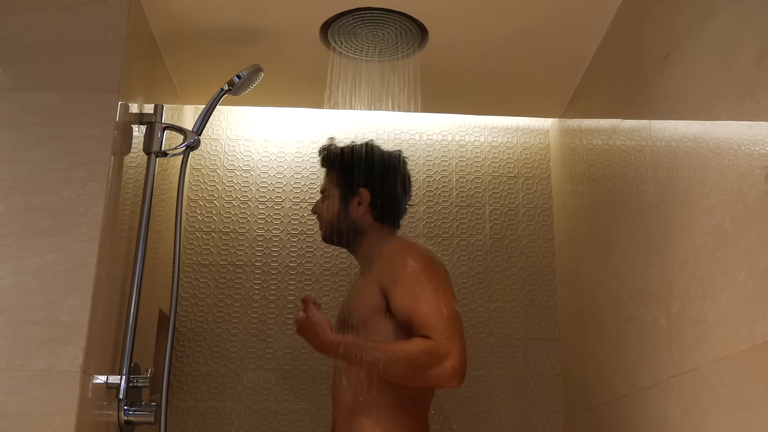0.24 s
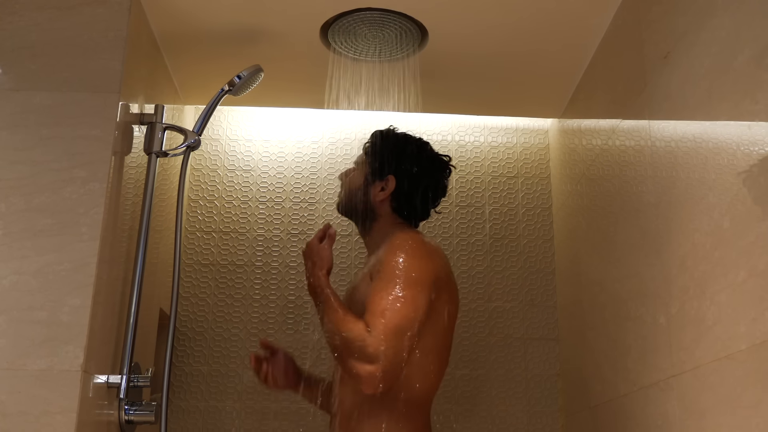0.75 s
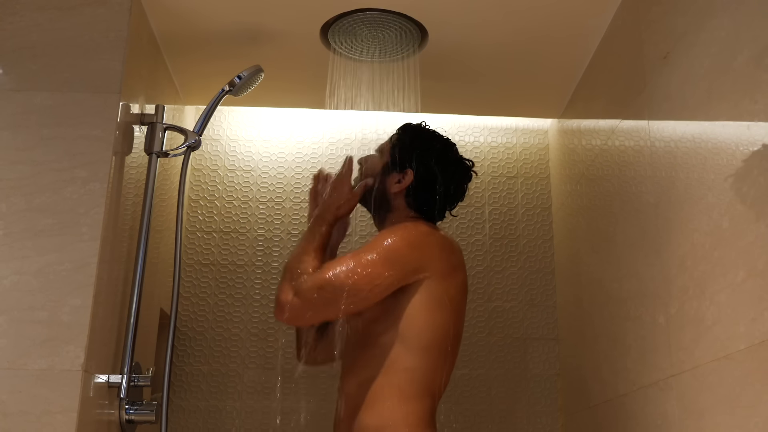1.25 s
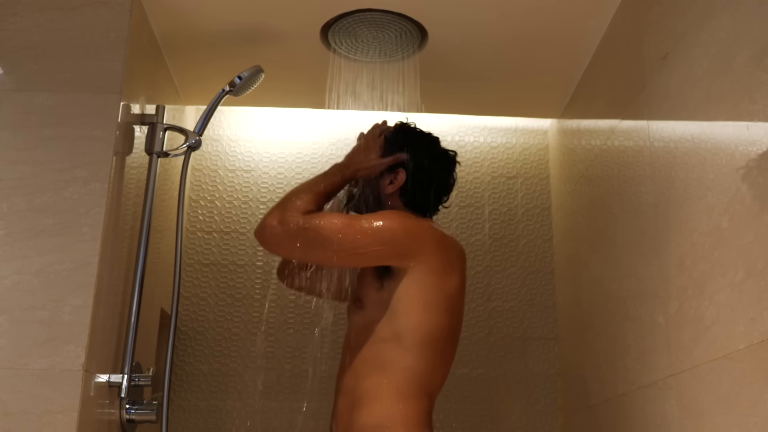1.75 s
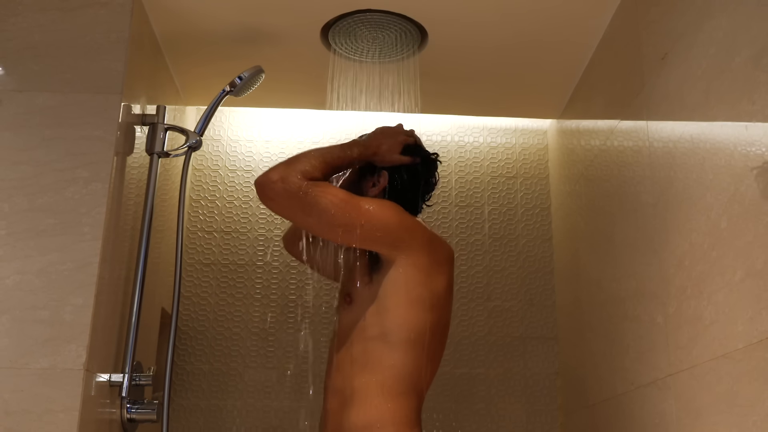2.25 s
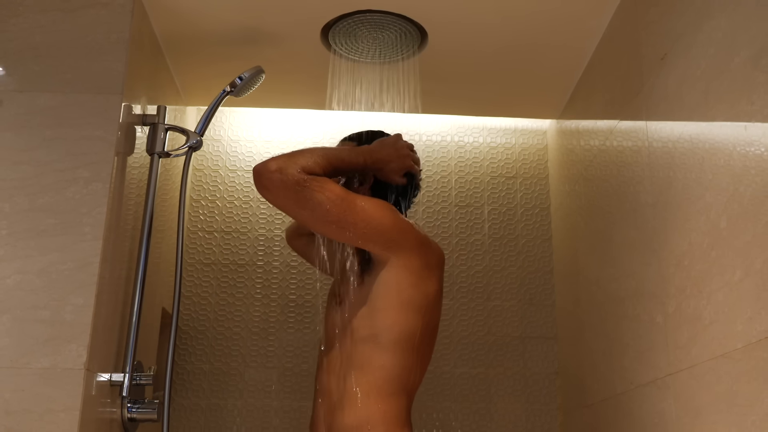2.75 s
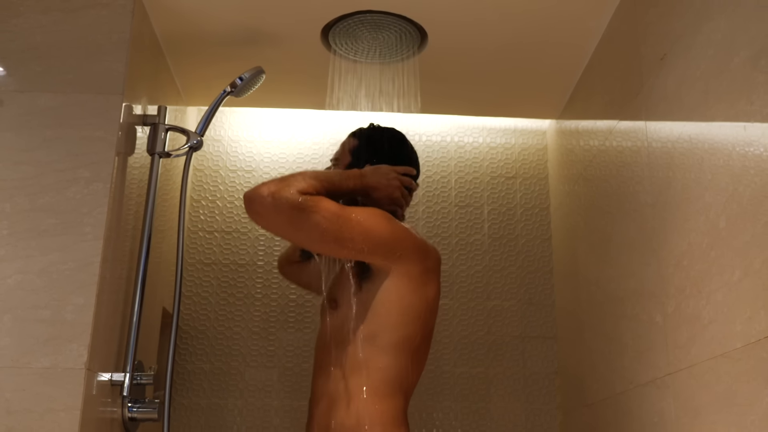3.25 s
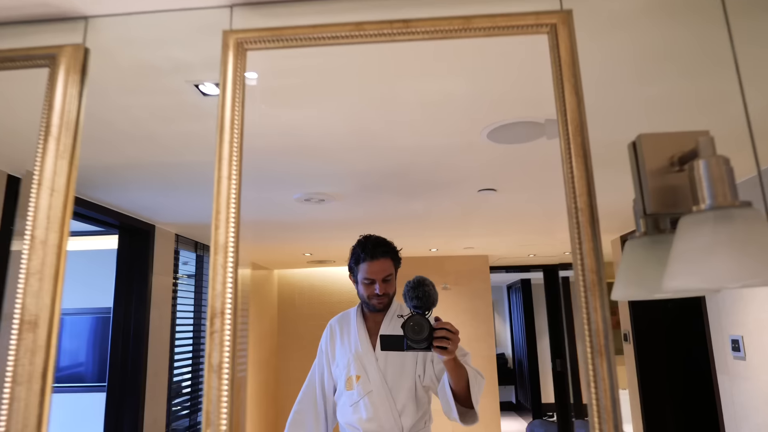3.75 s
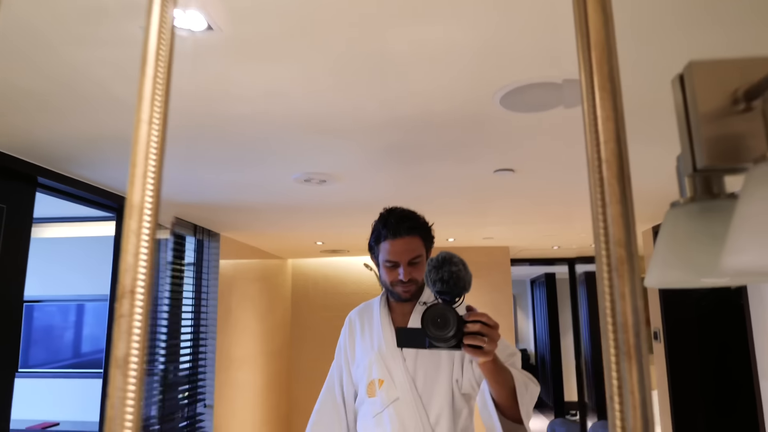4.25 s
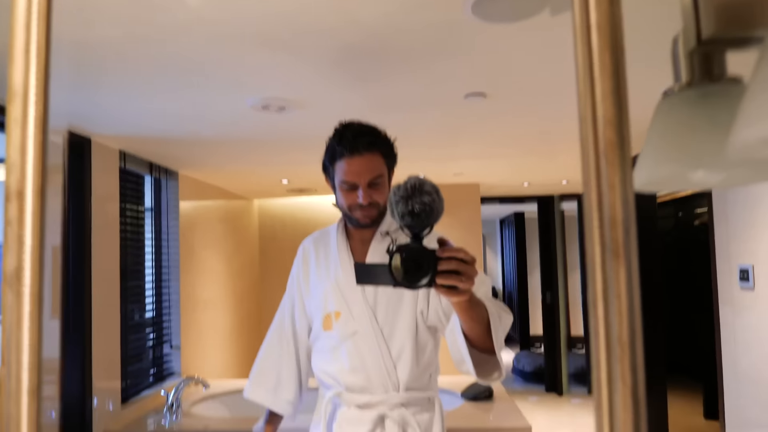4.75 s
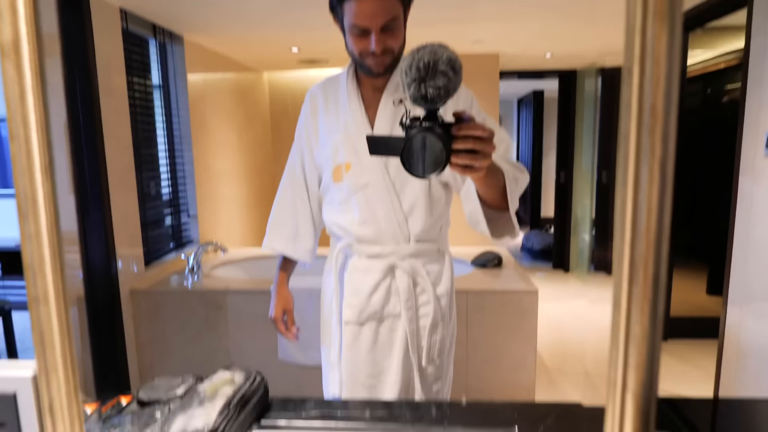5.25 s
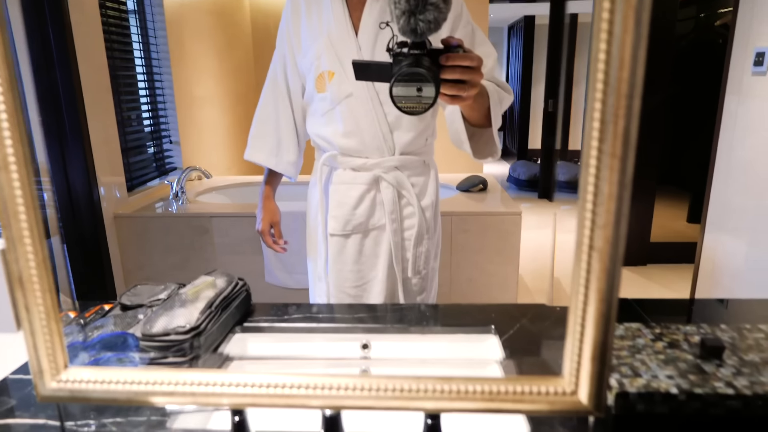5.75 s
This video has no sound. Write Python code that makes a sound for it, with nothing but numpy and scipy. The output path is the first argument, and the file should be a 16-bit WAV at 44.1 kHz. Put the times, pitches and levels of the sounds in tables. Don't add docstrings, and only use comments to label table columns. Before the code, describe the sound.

A bright overhead shower hisses and splashes in a hard tiled stall, then cuts abruptly to a low ventilation hum with faint cloth and soft steps.

```python
import sys
import numpy as np
from scipy import signal
from scipy.fft import rfft, irfft
from scipy.io import wavfile
from scipy.ndimage import uniform_filter1d

SR = 44100
rng = np.random.default_rng(int(sys.argv[2]) if len(sys.argv) > 2 else 0)


def level_to_linear(level):
    exponent = np.asarray(level, float) / 20
    return 10 ** exponent


def wav_record(signal):
    frames = np.transpose(np.atleast_2d(signal))
    bounded = np.clip(frames, -1, 1)
    quanta = np.round(bounded * 32767).astype(np.int16)
    wavfile.write(sys.argv[1], SR, quanta)


N = 264156
CUT_S, CUT_FADE_S = 3.7308, 0.002

# frequency in Hz, level in dB per Hz.
VENT_SPECTRUM = [(11, -44), (25, -13), (48, -17.5), (123, -2), (155, -13.5), (173, -11.5), (230, -11),
                 (332, -17.5), (480, -21.5), (619, -25), (1150, -37.5), (1410, -41), (3110, -58.5),
                 (16000, -69.5)]
# frequency in Hz, width in Hz, lift in dB.
DUCT_MODES = [(75, 13, 4), (121, 64, 5), (197, 25, 4), (330, 25, 4), (395, 44, 7), (603, 29, 5.5)]
# frequency in Hz, level in dB per Hz.
CLOTH_SPECTRUM = [(590, -16), (1000, -3.5), (1300, -6.5), (2400, -10), (4100, -9.5), (5500, -19.5),
                  (16000, -35.5)]
# time in seconds, rustle level in dB.
ROBE_MOTION = [
    (3.76, -71),
    (4.0, -63),
    (4.03, -61),
    (4.2, -64),
    (4.28, -59.5),
    (4.38, -66),
    (4.55, -63.5),
    (5.1, -72),
    (5.96, -71),
]
# start in seconds, peak in dB, centre in Hz, length in seconds, width in octaves.
CLOTH_CREASES = [
    (4.009, -55, 3960, .015, .7),
    (4.012, -54, 1630, .14, .12),
    (4.262, -54, 2520, 0.035, 0.8),
    (4.46, -62, 6000, .07, 1.1),
    (5.092, -55.5, 3310, 0.011, 0.36),
]
# start in seconds, peak in dB, centre in Hz, length in
# seconds, width in octaves.
LOW_SWELLS = [
    (4.47, -23.5, 90, 0.05, 0.88),
    (5.972, -20.5, 121, 0.085, 0.33),
]

# frequency in Hz, level in dB per Hz.
WASH_SPECTRUM = [(8.2, -53.5), (14, -24), (53, -15.5), (87, -1), (162, -4), (204, -8), (246, -5.5),
                 (390, -9.5), (458, -11.5), (663, -8.5), (744, -3.5), (1210, -10.5), (1330, -9),
                 (2360, -9.5), (3500, -7.5), (4550, -32), (7700, -120)]
# frequency in Hz, width in Hz, lift over the wash in dB.
STALL_MODES = [(40, 11, 8), (102, 20, 2.5), (162, 18, 4), (238, 11, 6), (455, 11, 11), (524, 34, 6),
               (633, 40, 5.5), (944, 20, 7.5), (1038, 15, 6), (1125, 11, 11), (1311, 18, 2), (1449, 140, 4),
               (1567, 30, 8.5)]
# centre time in seconds, peak in dB, length in seconds.
TRAP_GULPS = [(0, -43.5, .04), (0.168, -43, 0.059), (0.36, -37, 0.072), (1.107, -39, 0.15),
              (1.37, -42, 0.039), (1.724, -43, 0.037), (1.985, -35, 0.052), (2.4, -46.5, .04),
              (2.692, -39, 0.034), (2.874, -43.5, 0.051), (3.191, -33, 0.053), (3.314, -37.5, 0.047),
              (3.425, -36, .06)]
# frequency in Hz, level in dB per Hz.
PATTER_SPECTRUM = [(1000, -35), (1800, -5.5), (2400, -7.5), (3000, -11.5), (3700, 1.5), (4400, 2),
                   (5100, -6.5), (6500, -7), (9000, -8.5), (12000, -34.5)]
# frequency in Hz, level in dB per Hz.
SPRAY_SPECTRUM = [(3000, -29.5), (5000, -2), (7000, -5), (8800, -0.5), (10800, -2.5), (13000, -1.5),
                  (15000, -3), (17000, -6)]
# time in seconds, run-off in dB, mist in dB.
RUNOFF_MIST = [(0, -32.5, -32.5), (.3, -32.5, -31.5), (.7, -32, -34), (1.1, -31, -31), (1.28, -29, -31),
               (1.35, -24.5, -32), (1.43, -31.5, -31), (1.7, -29.5, -30), (1.82, -33, -31.5),
               (1.98, -29, -31.5), (2.12, -32.5, -29), (2.36, -26.5, -29), (2.66, -29, -32.5),
               (2.85, -26, -31), (3.08, -30, -32.5), (3.16, -27, -30.5), (3.45, -27.5, -33.5),
               (3.71, -25, -30)]
# start in seconds, peak in dB, centre in Hz.
SPRAY_SPITS = [(0.2724, -23, 12700), (0.2912, -18, 14200), (0.5307, -14, 10300), (0.7643, -16.5, 11900),
               (0.8525, -22.5, 11400), (0.8689, -16, 11500), (1.0333, -20.5, 11800), (1.3804, -19.5, 10200),
               (1.3972, -14.5, 12300), (1.4674, -18, 10200), (1.5933, -16, 9950), (1.934, -20, 13700),
               (1.9679, -24.5, 12100), (1.9994, -23, 13700), (2.0734, -16.5, 13500), (2.2194, -19.5, 12800),
               (2.2932, -17, 9980), (2.3304, -22, 9960), (2.385, -19.5, 10900), (2.4634, -21.5, 11100),
               (2.8294, -18.5, 10300), (2.8968, -19.5, 12800), (2.9334, -16.5, 12500), (3.0554, -23, 10500),
               (3.0864, -18, 12400), (3.3854, -19, 9870), (3.5379, -16, 10800), (3.6028, -16.5, 9880),
               (3.6591, -16, 9830), (3.7264, -20, 10200)]
# start in
# seconds, peak in dB, centre in Hz.
SPLAT_BRIGHT_PARTS = [(0.1376, -16, 6050), (1.1044, -18, 7170), (1.2291, -17, 5400), (1.3793, -21, 5860),
                      (1.4666, -15.5, 7920), (1.5933, -17, 7620), (1.8731, -17, 5560), (1.9385, -17, 6870),
                      (1.9669, -13, 7560), (2.2543, -15, 6360), (2.3264, -15, 7690), (2.4578, -11.5, 6980),
                      (2.5124, -20, 6820), (2.83, -13, 6150), (2.9274, -16.5, 6020), (3.0275, -14, 6390),
                      (3.237, -11, 5580), (3.3842, -13, 5470), (3.488, -8, 6050), (3.6067, -15.5, 6030),
                      (3.7219, -13.5, 5580)]
# start in seconds, peak in dB, centre in Hz, width in octaves.
FLOOR_SPLATS = [(0.1474, -22, 3720, 0.25), (0.3885, -13.5, 4100, 0.11), (0.4378, -17, 4170, 0.17),
                (0.854, -18.5, 3870, 0.27), (1.1942, -18.5, 4000, 0.27), (1.2815, -17.5, 4960, 0.33),
                (1.3112, -12, 4240, 0.27), (1.3398, -9.5, 3520, 0.31), (1.5976, -14.5, 3920, 0.21),
                (1.8735, -14.5, 3760, 0.41), (1.94, -21, 4240, 0.32), (1.9673, -15, 4500, 0.32),
                (2.324, -17.5, 4540, 0.24), (2.4195, -18.5, 4100, 0.34), (2.4583, -16.5, 4350, 0.27),
                (2.5252, -11, 3780, 0.51), (2.5842, -14, 4100, 0.45), (2.6111, -9, 4020, 0.28),
                (2.7926, -12.5, 4070, 0.35), (2.837, -11.5, 4450, 0.7), (2.8878, -13.5, 3470, 0.6),
                (2.9327, -11, 3680, 0.34), (2.9692, -14, 4010, 0.27), (3.2342, -11.5, 3950, 0.27),
                (3.3394, -17.5, 4410, 0.24), (3.3835, -18.5, 3640, 0.22), (3.4117, -12.5, 4100, 0.31),
                (3.6047, -14, 3870, 0.27), (3.6448, -20, 4250, 0.21), (3.672, -12, 3890, 0.27)]
# start in seconds, peak in dB, centre in Hz, length in seconds, width in octaves.
WATER_HANDFULS = [
    (1.516, -16, 3400, 0.02, 0.35),
    (1.7744, -24, 2960, 0.013, 0.38),
    (2.167, -21, 3400, 0.02, 0.38),
    (2.852, -13, 3220, 0.011, 0.38),
    (3.126, -11, 3150, 0.031, 0.46),
    (3.296, -9, 3160, 0.015, 0.38),
    (3.4827, -8, 3340, 0.02, 0.43),
]
# start in seconds, level in dB, centre in Hz.
CHANNEL_SLIPS = [
    (.005, -22, 10200),
    (.401, -20, 6400),
    (.401, -21, 12200),
    (.633, -22, 13200),
    (1.492, -19, 13700),
    (1.655, -17, 7460),
    (2.677, -24, 13000),
    (2.769, -18, 7460),
    (2.769, -20, 10200),
    (2.769, -18.5, 14700),
]

VENT_DB, VENT_SAG_DB_PER_S = -39.5, 0.3
MIC_NOISE_DB, CONVERTER_HISS_DB = -76.5, -76.5
WASH_DB = -31 - 0.47
TRAP_HZ, TRAP_WIDTH_HZ, TRAP_DB = 748, 45, -49
TRAY_HZ, TRAY_WIDTH_HZ, TRAY_DB = 1340, 150, -41.5
TRAY_SAG_DB_PER_S = 0.35
SPIT_S, SPIT_OCTAVES = 0.012, 0.45
SLAP_S, SLAP_OCTAVES = 0.012, 0.33
SPLAT_S = 0.012
STRAYS_PER_S, STRAY_DB = 14, 9
STRAY_LOW_HZ, STRAY_RANGE_OCTAVES, STRAY_WIDTH_OCTAVES = 3500, 1.9, 0.3
SLIP_S, SLIP_OCTAVES = 0.0119, 0.076
BAND_EDGE_HZ = 15780


def evened(x):
    return x / np.sqrt(np.mean(x ** 2) + 1e-20)


def read(points, hz):
    f, value = np.transpose(points)
    return np.interp(np.log(hz + 1), np.log(f + 1), value)


def curve(rows, column):
    rows = np.array(rows)
    return np.interp(np.arange(N) / SR, rows[:, 0], rows[:, column])


def alike(rows, length_s, octaves):
    return [(*row, length_s, octaves) for row in rows]


def coloured(x, points, modes=()):
    hz = np.fft.rfftfreq(len(x), 1 / SR)
    db = read(points, hz)
    for mode_hz, width_hz, lift_db in modes:
        db = db + lift_db / (1 + (2 * (hz - mode_hz) / width_hz) ** 2)
    return evened(irfft(rfft(x) * level_to_linear(db), len(x)))


def drops(per_s, spread_db, hiss):
    sizes = level_to_linear(spread_db * np.minimum(rng.exponential(1, N), 5)) * rng.standard_normal(N)
    clicks = evened(sizes * (rng.random(N) < per_s / SR))
    return clicks + hiss * rng.standard_normal(N)


def patchy(x, depth_db, frames, bins):
    z = signal.stft(x, nperseg=256, noverlap=192)[2]
    field = rng.standard_normal(z.shape[::-1])
    field = uniform_filter1d(field, frames, 0)
    field = evened(uniform_filter1d(field, bins, 1)).T
    y = signal.istft(z * level_to_linear(depth_db * field), nperseg=256, noverlap=192)[1]
    return evened(y[:N])


def bursts(rows, rise_s, tail_db, tail_s, lumpy_db):
    out, t = np.zeros(N + SR), np.arange(8192) / SR
    hz = np.fft.rfftfreq(len(t), 1 / SR)
    noises = rng.standard_normal((len(rows), 2, len(t)))
    for (start_s, peak_db, centre_hz, length_s, octaves), (grain, lump) in zip(rows, noises):
        band = np.exp(-0.5 * (np.log2((hz + 1) / centre_hz) / octaves) ** 2)
        lumps = level_to_linear(lumpy_db * evened(uniform_filter1d(lump, size=40)))
        tail = level_to_linear(tail_db - 60 * t / tail_s)
        shape = np.exp(-(t / length_s) ** 2) * lumps + tail
        rise = np.minimum(t / rise_s, 1)
        burst = evened(irfft(rfft(grain) * band, len(t))) * shape * rise
        first = max(round((start_s - rise_s / 2) * SR), 0)
        out[first:first + len(t)] += level_to_linear(peak_db - 13.5) * burst
    return out[:N]


def hollow(hz, width_hz, per_s):
    feed = drops(per_s, spread_db=1.9, hiss=1.9)
    ring = coloured(feed, [(20, -64.0), (20000, -60.0)], [(hz, 3 * width_hz, 45)])
    power = uniform_filter1d(ring ** 2, size=1800)
    return evened(ring / (power + 0.05) ** 0.35)


def ventilation():
    db = VENT_DB - VENT_SAG_DB_PER_S * (np.arange(N) / SR - CUT_S)
    return level_to_linear(db) * coloured(rng.standard_normal(N), VENT_SPECTRUM, DUCT_MODES)


def robe():
    cloth = coloured(drops(3000, spread_db=1.6, hiss=8.2), CLOTH_SPECTRUM)
    cloth = patchy(cloth, depth_db=1.5, frames=16, bins=8)
    creases = bursts(CLOTH_CREASES, rise_s=0.004, tail_db=-2, tail_s=0.5, lumpy_db=1.5)
    return level_to_linear(curve(ROBE_MOTION, 1)) * cloth + creases


def low_swells():
    return bursts(LOW_SWELLS, rise_s=0.025, tail_db=-20, tail_s=0.3, lumpy_db=0)


def quiet_room():
    return ventilation() + robe() + low_swells() + level_to_linear(MIC_NOISE_DB) * rng.standard_normal(N)


def wash():
    return level_to_linear(WASH_DB) * coloured(drops(2500, spread_db=3.4, hiss=2.4), WASH_SPECTRUM, STALL_MODES)


def drain_trap():
    t, level = np.arange(N) / SR, level_to_linear(TRAP_DB)
    for centre_s, peak_db, length_s in TRAP_GULPS:
        level = level + level_to_linear(peak_db) * np.exp(-((t - centre_s) / length_s) ** 2)
    return level * hollow(TRAP_HZ, TRAP_WIDTH_HZ, per_s=300)


def tray():
    db = TRAY_DB - TRAY_SAG_DB_PER_S * np.arange(N) / SR
    return level_to_linear(db) * hollow(TRAY_HZ, TRAY_WIDTH_HZ, per_s=970)


def streams(runoff_db):
    patter = coloured(drops(4000, spread_db=4.1, hiss=2.2), PATTER_SPECTRUM)
    patter = patchy(patter, depth_db=1.37, frames=14, bins=9)
    spray = coloured(drops(5000, spread_db=1.9, hiss=0.89), SPRAY_SPECTRUM)
    spray = patchy(spray, depth_db=0.8, frames=8, bins=25)
    return level_to_linear(runoff_db - 1.0) * patter + level_to_linear(curve(RUNOFF_MIST, 2) - 0.5) * spray


def stray_splashes(runoff_db):
    when, size, pitch = rng.random((round(STRAYS_PER_S * CUT_S), 3)).T
    start_s = when * CUT_S
    db = runoff_db[(start_s * SR).astype(int)] + STRAY_DB - 6 * size
    centre_hz = STRAY_LOW_HZ * 2 ** (STRAY_RANGE_OCTAVES * pitch ** 2)
    rows = alike(np.transpose([start_s, db, centre_hz]), SLAP_S, STRAY_WIDTH_OCTAVES)
    return bursts(rows, rise_s=0.003, tail_db=-3.5, tail_s=0.26, lumpy_db=2.5)


def spits():
    rows = alike(SPRAY_SPITS, SPIT_S, SPIT_OCTAVES)
    return level_to_linear(-1.0) * bursts(rows, rise_s=0.005, tail_db=-3.5, tail_s=0.13, lumpy_db=4.0)


def splats():
    rows = [(s, db, hz, SPLAT_S, octaves) for s, db, hz, octaves in FLOOR_SPLATS]
    rows += alike(SPLAT_BRIGHT_PARTS, SLAP_S, SLAP_OCTAVES)
    rows += list(WATER_HANDFULS)
    return level_to_linear(-1.0) * bursts(rows, rise_s=0.005, tail_db=-4.5, tail_s=0.71, lumpy_db=1.5)


def shower():
    runoff_db = curve(RUNOFF_MIST, 1)
    steady = wash() + drain_trap() + tray() + streams(runoff_db)
    return steady + stray_splashes(runoff_db) + spits() + splats()


def scene():
    fade = np.clip((np.arange(N) / SR - CUT_S) / CUT_FADE_S + 0.5, 0, 1)
    return np.tile((1 - fade) * shower() + fade * quiet_room(), (2, 1))


def low_pass(x):
    return signal.sosfilt(signal.butter(12, 15740, fs=SR, output="sos"), x)


def record(dry):
    rows = alike(CHANNEL_SLIPS, SLIP_S, SLIP_OCTAVES)
    slips = bursts(rows, rise_s=0.009, tail_db=-70, tail_s=0.1, lumpy_db=0)
    hiss = level_to_linear(CONVERTER_HISS_DB) * rng.standard_normal(dry.shape)
    lowpass = signal.firwin(511, BAND_EDGE_HZ, window=("kaiser", 9), fs=SR)
    mix = signal.oaconvolve(dry + hiss + np.array([slips, -slips]), lowpass[None], "same")
    return low_pass(mix)


dry = scene()
out = record(dry)
wav_record(out)
```